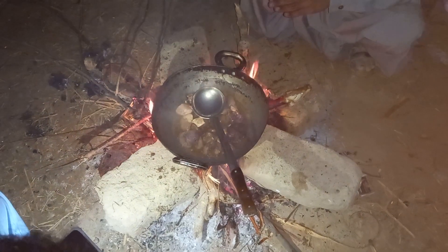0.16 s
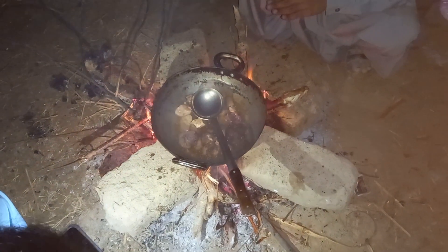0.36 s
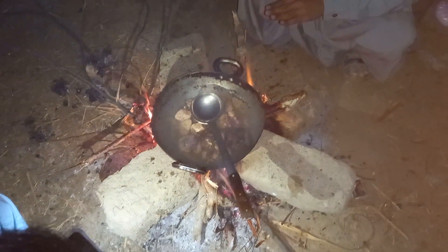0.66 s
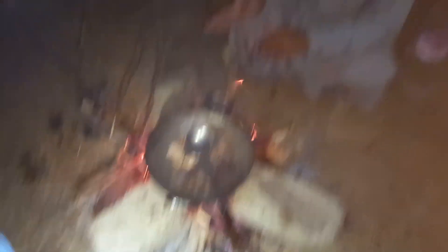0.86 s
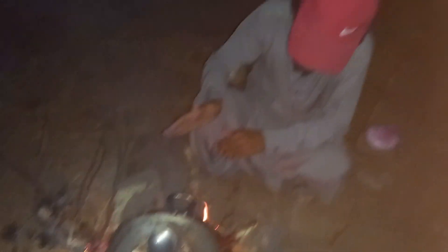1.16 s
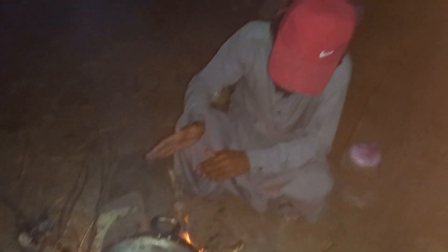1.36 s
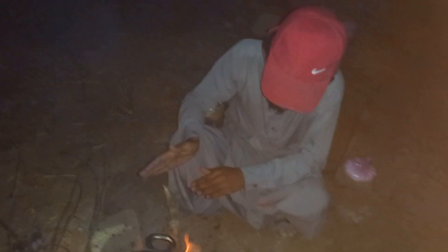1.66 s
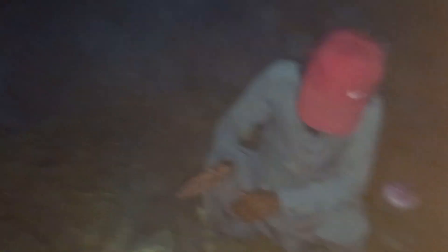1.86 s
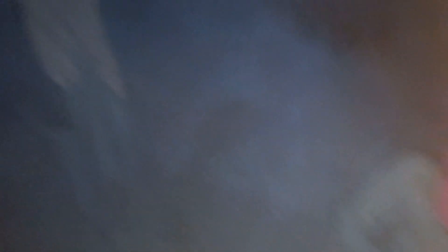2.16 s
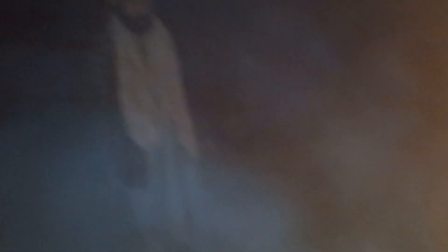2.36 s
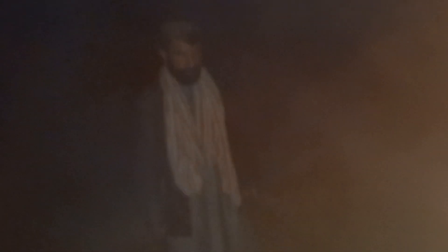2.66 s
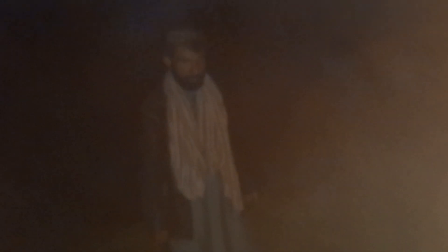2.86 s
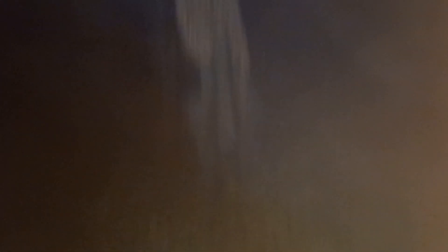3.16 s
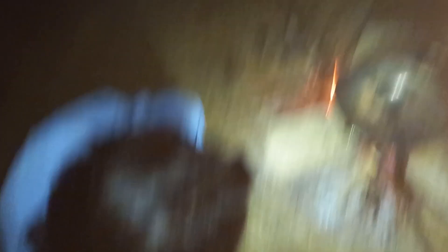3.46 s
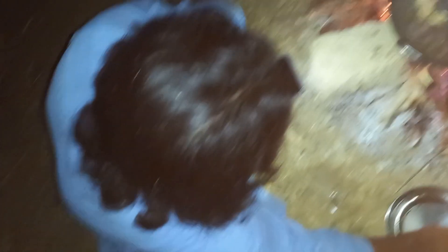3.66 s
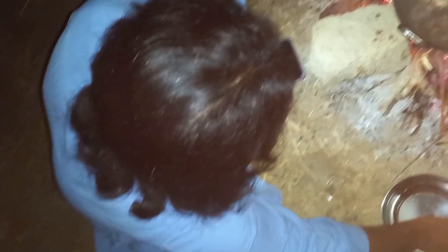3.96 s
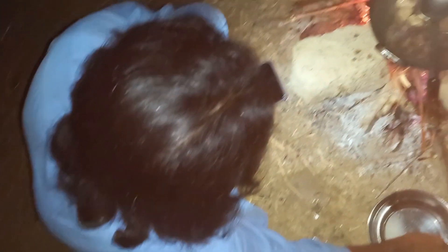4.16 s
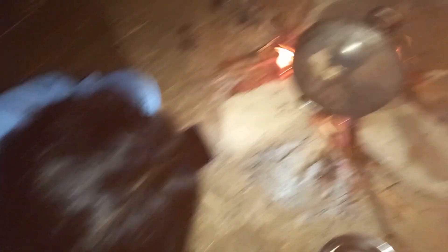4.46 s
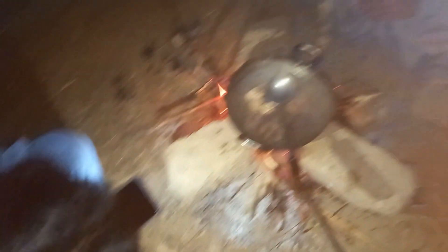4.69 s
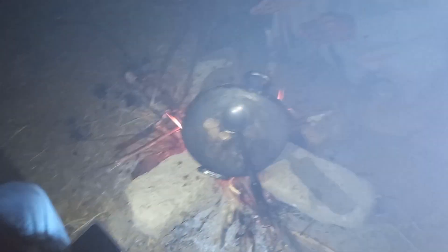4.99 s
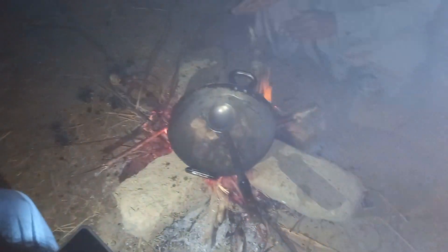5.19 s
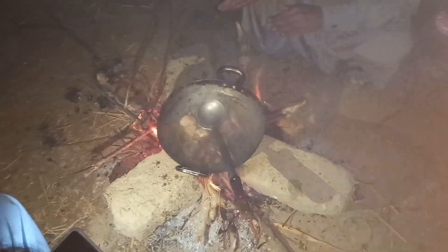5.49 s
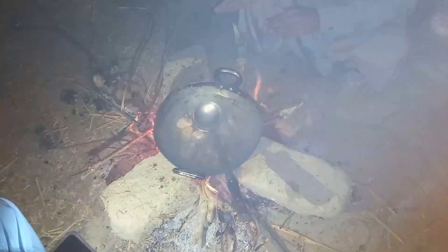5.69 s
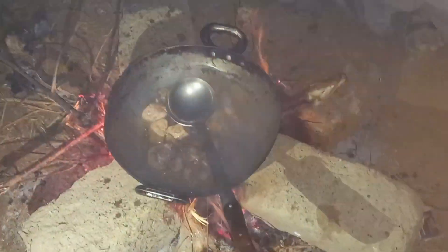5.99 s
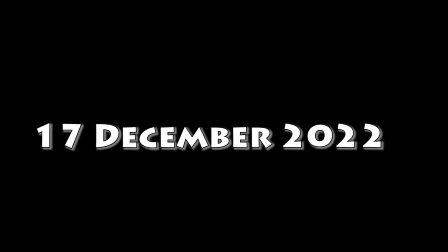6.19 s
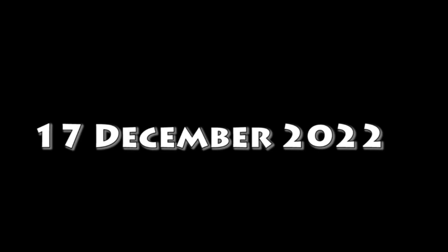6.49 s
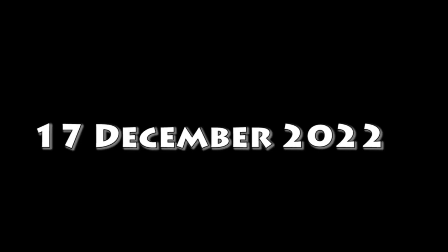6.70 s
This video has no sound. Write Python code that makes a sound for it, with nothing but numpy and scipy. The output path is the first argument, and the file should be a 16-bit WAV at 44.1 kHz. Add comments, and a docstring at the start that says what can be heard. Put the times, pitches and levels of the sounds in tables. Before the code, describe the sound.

From 0 s a dense, steady sizzle of food under an iron lid fills the stereo field, made of rapid tiny bubble bursts over fine hiss, slightly hollow and metallic. A wood fire mutters very low beneath, growing faintly. Around 0.9 to 1.3 s the hand-held microphone tilts up and the sizzle swells a little; at 1.4 s the lid gives one short, bright knock with a very fast fading bounce. Sharp ticks of wood and fat follow at about 1.8, 1.9, 2.05, 2.2 and 3.2 s, with faint bumps on the case near 2.1 s. The hiss changes colour while turned away, then from 3.45 s is shaded by a crouching body. Snaps come at 4.05, 4.8 and 5.4 s. Near 5.1 s two soft, low handling thumps meet another gentle swell. The open-air sizzle continues until about 6.16 s, then cuts instantly to silence.

```python
"""Food sizzles in a lidded iron pan on an open wood fire, outdoors, with flames muttering low throughout.
Bubble bursts over a fine hiss, coloured by the hollow under the lid, reach two hand-held microphones.
These tilt up from the pan; the sizzle swells and the lid, a bank of ringing modes, knocks once and bounces.
Wood and fat tick (resonant noise snaps) and the case takes soft low bumps (gliding sines).
Turned far away, the microphones swing back past a crouching body; the sizzle swells again, then all stops dead."""
import sys
import numpy as np
from scipy import signal
from scipy.fft import rfft, irfft, next_fast_len
from scipy.io import wavfile
from scipy.ndimage import map_coordinates

SR = 44100
rng = np.random.default_rng(int(sys.argv[2]) if len(sys.argv) > 2 else 0)


def persist_wave(psi):
    """Save psi, clipped to +-1, as 16-bit WAV."""
    counts = np.round(np.clip(psi, -1, 1) * 32767).astype(np.int16)
    wavfile.write(sys.argv[1], SR, np.atleast_2d(counts).T)


N = 301599
TIME_S = np.arange(N) / SR


def from_db(db):
    """Decibels to gain."""
    return 10 ** (np.asarray(db) / 20)


def rms_one(x):
    """Scale to unit rms."""
    return x / np.sqrt(np.mean(x ** 2) + 1e-20)


def at_hz(rows, hz):
    """Each column of a spectrum table, read on a log-frequency axis."""
    knots_hz, *columns = np.transpose(rows)
    return np.array([np.interp(np.log(hz + 1), np.log(knots_hz), c) for c in columns])


def drift(knots_per_s):
    """Smooth random wandering of spread 1: a cubic spline through random knots."""
    knots = rng.standard_normal(4000)
    return rms_one(map_coordinates(knots, [TIME_S * knots_per_s], order=3, mode="wrap"))


def resonate(x, hz, width_hz):
    """A two-pole resonance with gain 1 at its centre."""
    radius, angle = np.exp(-np.pi * width_hz / SR), 2 * np.pi * hz / SR
    zeros = np.array([1, 0, -1]) * (1 - radius ** 2) / 2
    poles = [1, -2 * radius * np.cos(angle), radius ** 2]
    return signal.lfilter(zeros, poles, x)


def add(out, start_s, sound):
    """Mix a short sound in at start_s."""
    start = int(start_s * SR)
    out[:, start:start + sound.shape[-1]] += sound


# Left-right likeness: pitch_hz, likeness (0-1)
MIC_LIKENESS = [(200, .95), (700, 0.99), (1200, 0.92), (1800, 0.6), (3300, 0.54), (5000, 0.4), (7000, 0.4),
                (12000, 0)]


def likeness(hz):
    """The two microphones hear long waves alike, short ones less so."""
    return np.clip(at_hz(MIC_LIKENESS, hz)[0], 0, 1)


# Flame spectrum: pitch_hz, relative_level_db (per Hz)
FLAME_SPECTRUM = [(20, -27), (35, -13.5), (60, -3.5), (85, -1), (125, -2.5), (200, -14), (400, -9.5),
                  (900, -32.5)]
FLAME_START_DB, FLAME_GROWTH_DB_PER_S = -58.5, 0.47


def flames(side_db, flicker_db):
    """Shaped low noise, flickering and slowly growing, nearly alike at both microphones."""
    size = next_fast_len(N)
    shape = from_db(at_hz(FLAME_SPECTRUM, np.fft.rfftfreq(size, 1 / SR)))
    noise = rng.standard_normal((2, size))
    mid, side = irfft(rfft(noise) * shape, size)[:, :N]
    both = mid + from_db(side_db) * side * np.array([[1], [-1]])
    level_db = FLAME_START_DB + FLAME_GROWTH_DB_PER_S * TIME_S + flicker_db * drift(22)
    return from_db(level_db) * rms_one(both)


# Bumps on the hand-held case: start_s, level_db (fundamental's peak, mean of both sides),
# start_hz, end_hz, length_s, left_minus_right_db
CASE_BUMPS = [(2.106, -36, 302, 190, 0.015, -17), (2.117, -50, 81, 60, 0.078, -12),
              (2.472, -48, 80, 65, 0.035, -14), (3.953, -47, 70, 60, 0.088, -16),
              (5.106, -24, 250, 213, 0.025, 1), (5.132, -23, 230, 205, 0.014, 1),
              (5.135, -37, 162, 180, 0.076, 2.5), (5.998, -43, 258, 150, 0.02, 0)]


def bumps(overtone_db):
    """A few gliding low cycles that swell and fade, with a weak octave."""
    out = np.zeros((2, N))
    for start_s, level_db, start_hz, end_hz, length_s, pan_db in CASE_BUMPS:
        glide_hz = np.linspace(start_hz, end_hz, int(length_s * SR))
        phase = 2 * np.pi * np.cumsum(glide_hz) / SR
        swell = np.sin(np.linspace(0, np.pi, len(phase)))
        wave = (np.sin(phase) + from_db(overtone_db) * np.sin(2 * phase)) * swell
        add(out, start_s, from_db(level_db + pan_db * np.array([[.5], [-.5]])) * wave)
    return out


# Ticks of burning wood and spitting fat: start_s, peak_db (louder side), centre_hz, width_hz
WOOD_AND_FAT_TICKS = [(1.763, -9.5, 2500, 2000), (1.9, -12, 4100, 400), (2.055, -9, 11000, 5000),
                      (2.221, -7.5, 1000, 1300), (3.1714, -9, 4880, 3000), (3.612, -21, 1800, 50),
                      (4.0543, -10, 4000, 2000), (4.7713, -7, 12000, 7000), (5.248, -24.5, 1170, 120),
                      (5.3966, -10, 4000, 2000)]


def ticks(snap_s, size=2000):
    """Each tick is a decaying snap of noise through one resonance."""
    out, age_s = np.zeros((2, N)), np.arange(size) / SR
    for start_s, peak_db, centre_hz, width_hz in WOOD_AND_FAT_TICKS:
        noise = rng.standard_normal((2, size)) * np.exp(-age_s / snap_s)
        snap = resonate(noise, centre_hz, width_hz)
        alike = likeness(centre_hz)
        snap[1] = alike * snap[0] + np.sqrt(1 - alike ** 2) * snap[1]
        add(out, start_s, from_db(peak_db) * snap / np.abs(snap).max())
    return out


KNOCK_S, KNOCK_DB = 1.4102, -7.5
LEAD_S, LEAD_DB = .002, -18
BOUNCE_S, BOUNCE_DB, BOUNCE_LOSS_DB = .0042, -14.5, 1.5


def lid_touches(count=4):
    """A leading tick, the knock on the rim and even, fading bounces, as (start_s, level_db)."""
    bounces = [(KNOCK_S + (k + 1) * BOUNCE_S, BOUNCE_DB - k * BOUNCE_LOSS_DB) for k in range(count)]
    return [(KNOCK_S - LEAD_S, LEAD_DB), (KNOCK_S, KNOCK_DB)] + bounces


# Ringing modes of the lid: pitch_hz, level_db (relative to the touch), t60_s
LID_RINGING = [(393, -33.5, .15), (456, -29, 0.16), (686, -21.5, .07), (960, -22, 0.062),
               (1300, -18.5, 0.034), (1870, -10, 0.044), (2315, -9, .07), (2900, -13.5, 0.033),
               (4200, -9, .03), (5370, -7, .04), (5680, -12, 0.031), (6090, -8, 0.026), (7100, -8.5, 0.044)]


def lid(scrape_db, scrape_s, size=8000):
    """Each touch is a short gritty scrape that sets all the lid's modes ringing."""
    out, age_s = np.zeros((2, N)), np.arange(size) / SR
    hz, mode_db, t60_s = np.transpose(LID_RINGING)[..., None]
    apart = 1 - likeness(hz)
    for start_s, level_db in lid_touches():
        phase = rng.uniform(0, 2 * np.pi, hz.shape) + apart * rng.normal(0, 1, (2, *hz.shape))
        decay = from_db(mode_db - 60 * age_s / t60_s)
        ring = np.sum(decay * np.sin(2 * np.pi * hz * age_s + phase), axis=1)
        grit = rng.standard_normal((2, size)) * np.exp(-age_s / scrape_s)
        scrape = resonate(grit, 3500, 5000)
        add(out, start_s, from_db(level_db) * (ring + from_db(scrape_db) * scrape))
    return out


SHADE_AT_S, SHADE_ATTACK_S, SHADE_HOLD_S, SHADE_RELEASE_S = 3.45, 0.16, .62, .8
SHADE_BEFORE, SHADE_DEPTH, SHADE_AFTER = .15, 0.81, .33   # 0-1


def shade(time_s):
    """A crouching body comes between pan and microphones, stays, then slides partly aside."""
    corners_s = SHADE_AT_S + np.cumsum([0, SHADE_ATTACK_S, SHADE_HOLD_S, SHADE_RELEASE_S])
    return np.interp(time_s, corners_s, [SHADE_BEFORE, SHADE_DEPTH, SHADE_DEPTH, SHADE_AFTER])


# Aim of the microphones: time_s, above_pan_deg
MIC_AIM = [(.88, 9), (1.22, 25), (2.07, 31), (2.25, 55), (2.85, 83), (3.22, 68), (3.42, 19), (4.6, 19.4),
           (5.0, 6.3)]
# Swells of the sizzle: peak_s, rise_db
SIZZLE_SWELLS = [(1.25, 1.8), (5.13, 1.4)]
SWELL_WIDTH_S = .22
FACING_DB, HORIZON_GAIN_DB = -0.17, 1.68   # level change facing the pan; rise towards the horizon
TILT_DEG, TILT_WIDTH_DEG, HORIZON_DEG = 40, 22, 90


def view(time_s):
    """Level change and the tilted, turned-away and shaded shares; tilt peaks at one angle, away grows."""
    aim_deg, shaded = np.interp(time_s, *np.transpose(MIC_AIM)), shade(time_s)
    away = aim_deg / HORIZON_DEG
    tilted = np.exp(-((aim_deg - TILT_DEG) / TILT_WIDTH_DEG) ** 2) * (1 - shaded)
    swell_db = sum(rise_db * np.exp(-((time_s - peak_s) / SWELL_WIDTH_S) ** 2)
                   for peak_s, rise_db in SIZZLE_SWELLS)
    return FACING_DB + HORIZON_GAIN_DB * away + swell_db, tilted, away, shaded


def echo(hz, delay_ms, share, cut_hz=4200):
    """A nearby surface adds a faint, dull echo: notches that sweep as the microphone moves."""
    late = np.exp(-2j * np.pi * np.outer(hz, delay_ms) / 1000)
    return 1 + share * late / (1 + (hz[:, None] / cut_hz) ** 2)


# Pan resonances that radiate unevenly, first row at the left microphone, second at the right:
# facing_hz, shift_hz (at the horizon), width_hz
UNEVEN_RESONANCES = [(2000, -90, 90), (1440, 210, 48)]


def phase_turns(hz, away):
    """All-pass resonances lose no level but set the microphones against each other in narrow bands."""
    f = hz[:, None]
    turns = []
    for facing_hz, shift_hz, width_hz in UNEVEN_RESONANCES:
        centre_hz = facing_hz + shift_hz * away
        turns.append(np.arctan2(width_hz * f, centre_hz ** 2 - f ** 2))
    return np.exp(-2j * np.array(turns))


def bursts(per_s, spread_db, surge_db, scatter_s, ring_share, count=24, size=320):
    """Bubbles burst at spots round the rim, each with its pitch and scattered path to each microphone."""
    age_s, out = np.arange(size) / SR, np.zeros((2, N))
    busy = from_db(surge_db * (drift(14) + drift(70)))   # flurries
    born = rng.random(N) < per_s * busy / SR
    strength = from_db(spread_db * np.minimum(rng.exponential(1, N), 3.7))
    clicks = born * strength * rng.choice([-1, 1], N)
    spot = rng.integers(0, count, N)
    paths = rng.standard_normal((count, 2, size)) * np.exp(-age_s / scatter_s)
    for k, hz in enumerate(np.linspace(1000, 15500, count)):
        paths[k] = paths[k] + ring_share * resonate(paths[k], hz, 700)
    # together the spots favour no pitch
    spectra = rfft(paths, 2 * size)
    mean_spectrum = np.sqrt(np.mean(np.abs(spectra) ** 2, axis=0))
    paths = irfft(spectra / mean_spectrum)[..., :size]
    for k, path in enumerate(paths):
        out += signal.oaconvolve((clicks * (spot == k))[None], path, axes=1)[:, :N]
    return rms_one(out)


# Sizzle facing the pan, before the lid echo and level changes: pitch_hz, left_db, right_db (per Hz)
FACING_COLOUR = [(250.0, -78.5, -78), (479, -75, -78), (820, -75, -74), (1136, -69.5, -69),
                 (1800.0, -64.5, -66.5), (2974, -69, -62.5), (3797, -57.5, -51.5), (5245, -58, -51.5),
                 (6020, -61, -57), (7206, -58.5, -72), (8520, -74, -71.5), (9760, -71, -69),
                 (13200, -55, -67), (15800.0, -61, -67.5)]
# Colour change when tilted up: pitch_hz, left_db, right_db
TILTED_CHANGE = [(607, 3, 2), (1410, 0.1, -2.8), (2294, 3.5, 4.5), (3000.0, -5.5, 2.1), (3730, 3, -13),
                 (4950, -0.5, -2.5), (5800.0, -9, -4), (7600, 11, -6), (8150, 13, 1.5), (9970, -1.5, -3.2),
                 (13500.0, -10, 0.5)]
# Colour change when turned away to the horizon: pitch_hz, left_db, right_db
AWAY_CHANGE = [(600.0, -3.1, 0.5), (1490, 1.5, -4.5), (2260, 7, 10), (3000.0, 9.5, -1.3), (3700, -5.5, -3),
               (4980, -1, -7), (5670, 2.5, 2), (7200, 0, 2.5), (8435, 8, -1.5), (9990, -3.5, -0.7),
               (13500.0, -7, -5.5)]
# Colour change at full shade behind a body: pitch_hz, left_db, right_db
SHADED_CHANGE = [(598, 5.5, 4), (1400.0, 0.5, 1.7), (2340, 2.5, -4.5), (3000.0, 11.5, 3.5), (4100, 6.5, 5),
                 (4830, -5.5, -5.5), (5700, -9, -0.5), (7500.0, 1.5, -6.5), (8370, 0.6, -7),
                 (10000.0, -4.5, -6.5), (13520, -10, 2.5)]
# Smallest bubbles merged into smooth hiss: pitch_hz, power_share (0-1)
HISS_POWER = [(500, 0.29), (1500, 0.32), (4000, 0.55), (8000, 0.42), (13000, 0.2)]
# Resting places of the microphones, with glides between: from_s, to_s, right_lag_ms,
# left_echo_ms, left_echo_share, right_echo_ms, right_echo_share
MIC_RESTS = [(0.0, 0.914, 0.078, 0.391, -0.24, 1.7, 0.15), (1.103, 2.078, 0.088, 0.38, -0.17, 0.57, -0.197),
             (2.304, 3.206, -0.16, 0.824, 0.29, 1.785, -0.244),
             (3.437, 4.493, -0.109, 0.851, 0.13, 1.773, 0.128),
             (4.859, 6.16, 0.033, 0.41, -0.26, 0.7, -0.135)]
LID_ECHO_HZ, LID_ECHO_SHARE, LID_ECHO_CUT_HZ = 578, 0.42, 2100


def sizzle(flutter_db, size=1024):
    """Bursts over a fine hiss, coloured by the hollow under the lid and the microphones' aim."""
    fat = bursts(per_s=2600, spread_db=2.5, surge_db=1.35, scatter_s=0.0012, ring_share=3.64)
    both = np.array([fat, rng.standard_normal((2, N))]) * from_db(flutter_db * drift(22.096))
    hz, time_s, (grains, hiss) = signal.stft(both, SR, nperseg=size)
    smooth = np.clip(at_hz(HISS_POWER, hz).T, 0, 1)
    left, right = np.sqrt(1 - smooth) * grains + np.sqrt(smooth) * hiss

    level_db, tilted, away, shaded = view(time_s)
    from_s, to_s, *settings = np.transpose(MIC_RESTS)
    rests_s = np.column_stack([from_s, to_s]).ravel()
    lag_ms, *echoes = [np.interp(time_s, rests_s, np.repeat(c, 2)) for c in settings]
    alike = likeness(hz)[:, None]
    lag = np.exp(-2j * np.pi * np.outer(hz, lag_ms) / 1000)
    right = alike * left * lag + np.sqrt(1 - alike ** 2) * right
    pair = np.array([left * echo(hz, *echoes[:2]), right * echo(hz, *echoes[2:])])

    # repeated bounces across the hollow lose treble
    bounce = LID_ECHO_SHARE / (1 + (hz / LID_ECHO_CUT_HZ) ** 2)
    hollow = 1 / (1 - bounce * np.exp(-2j * np.pi * hz / LID_ECHO_HZ))
    no_bass = 1 / np.sqrt(1 + (260 / (hz + 1)) ** 6)
    colour_db = at_hz(FACING_COLOUR, hz)[..., None] + level_db
    for change, share in ((TILTED_CHANGE, tilted), (AWAY_CHANGE, away), (SHADED_CHANGE, shaded)):
        colour_db = colour_db + at_hz(change, hz)[..., None] * share
    heard = pair * phase_turns(hz, away) * from_db(colour_db) * (hollow * no_bass)[:, None]
    # sqrt(SR / 2) turns level per Hz into amplitude
    return signal.istft(heard, SR, nperseg=size)[1][:, :N] * np.sqrt(SR / 2)


def scene():
    """Pan, fire and handling, in open air."""
    pan = sizzle(flutter_db=.45) + lid(scrape_db=0.5, scrape_s=.005)
    fire = ticks(snap_s=.0012) + flames(side_db=-6, flicker_db=2.5)
    return pan + fire + bumps(overtone_db=-14.5)


CUTOFF_HZ, END_S, FADE_DB_PER_S = 16150, 6.164, 4000


def record(dry, size=401):
    """The sound is switched off abruptly, and the top is cut."""
    switch = from_db(-FADE_DB_PER_S * np.clip(TIME_S - END_S, 0, .1))
    low_pass = signal.firwin(size, CUTOFF_HZ, fs=SR)
    return signal.oaconvolve(dry * switch, low_pass[None], mode="same", axes=1)


dry = scene()
out = record(dry)
persist_wave(out)
```